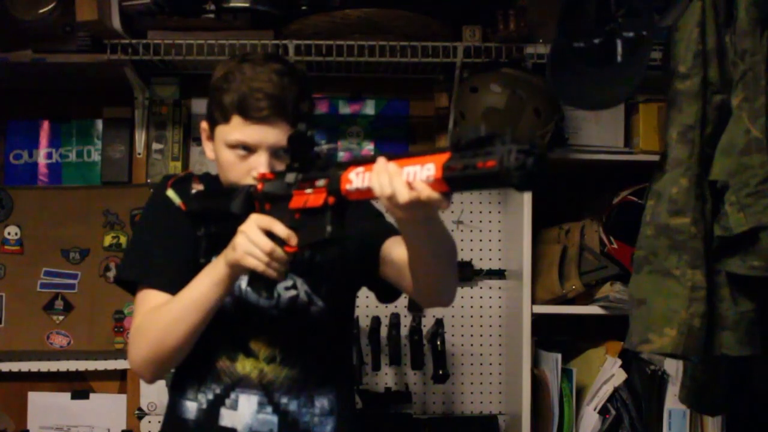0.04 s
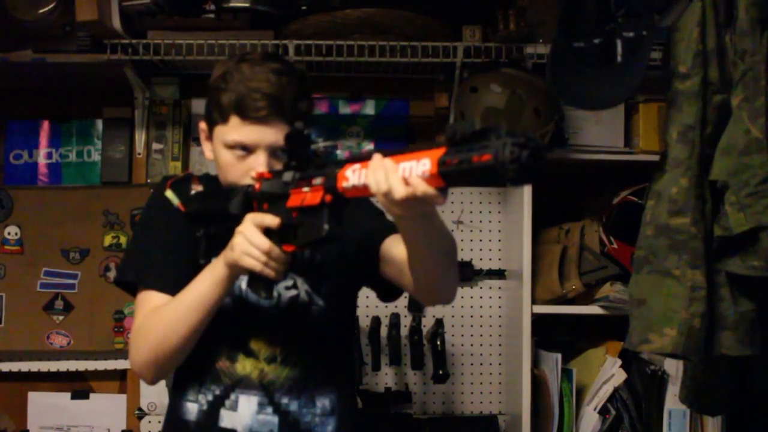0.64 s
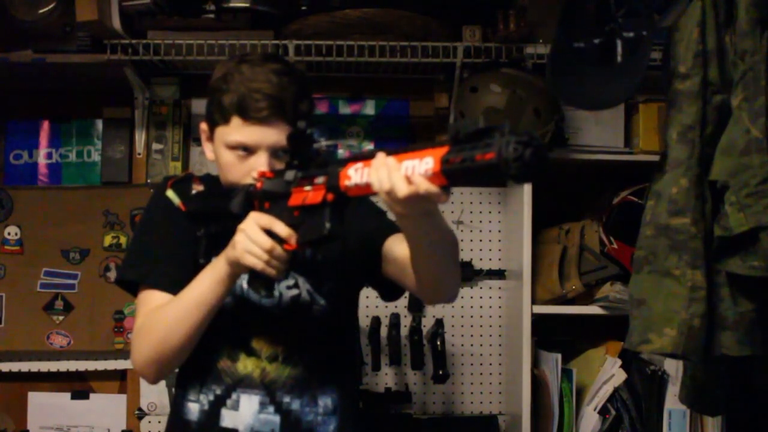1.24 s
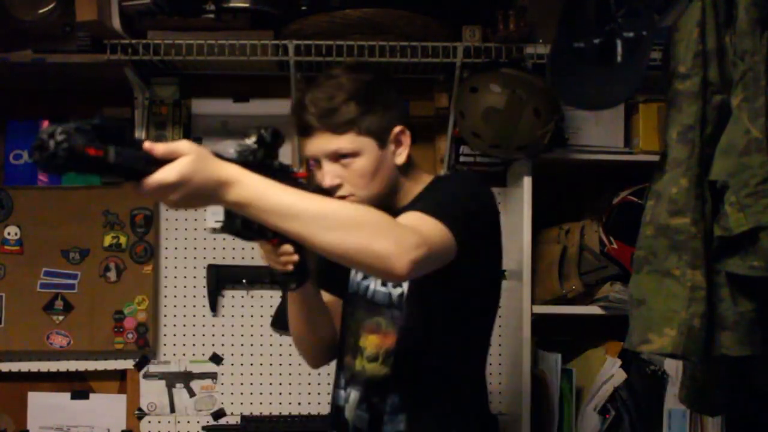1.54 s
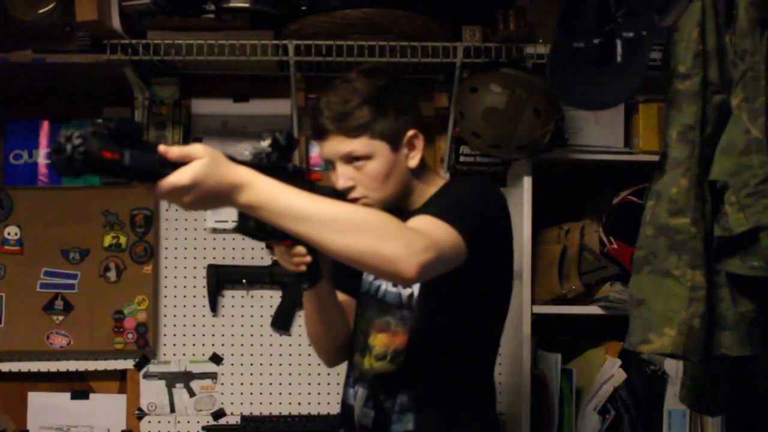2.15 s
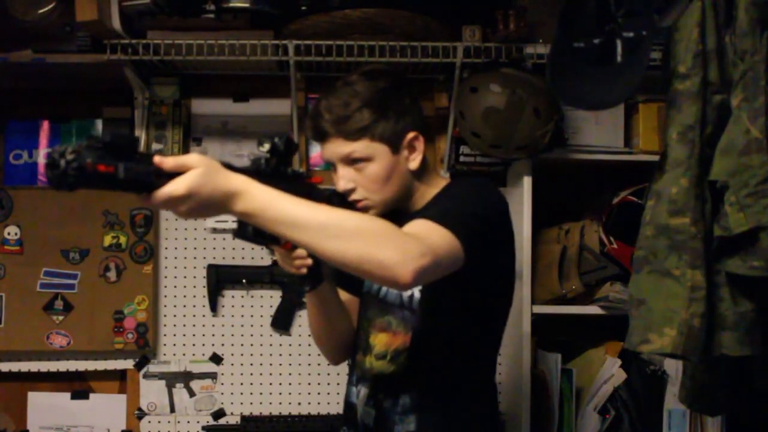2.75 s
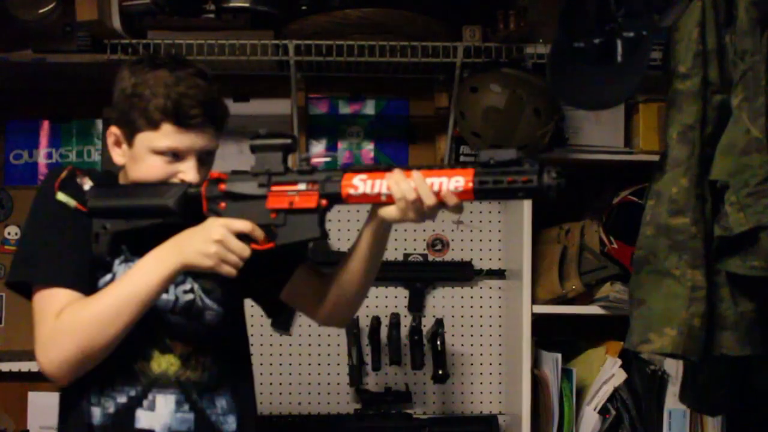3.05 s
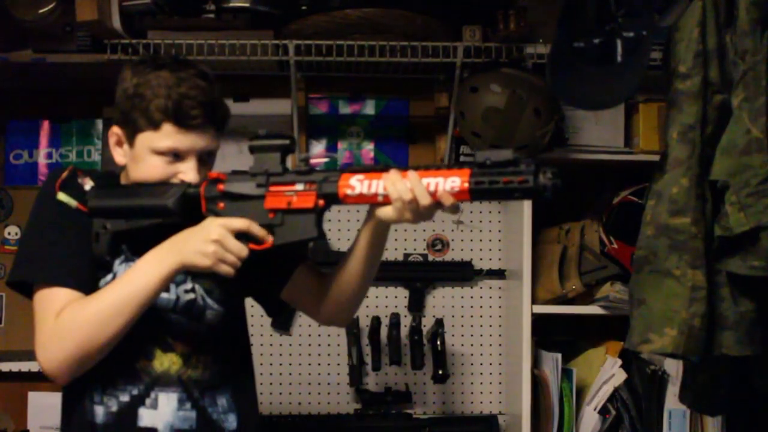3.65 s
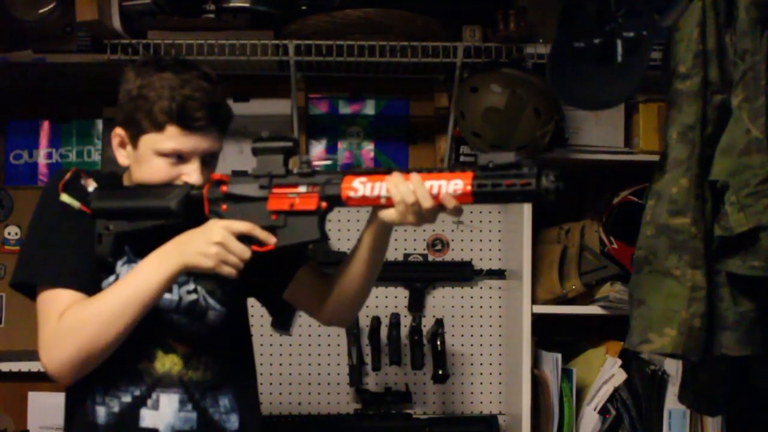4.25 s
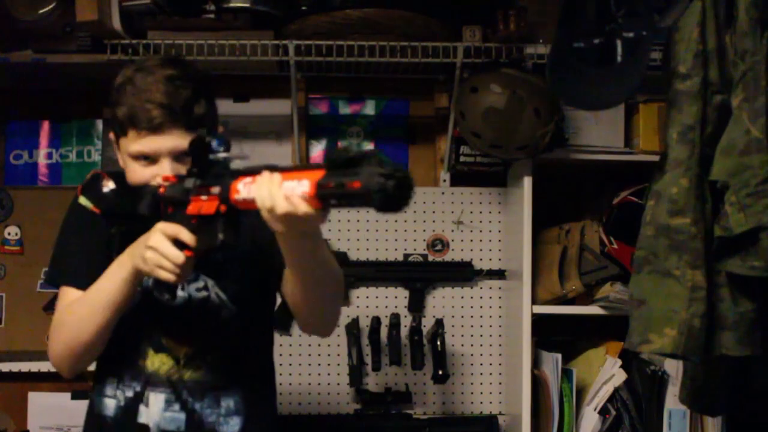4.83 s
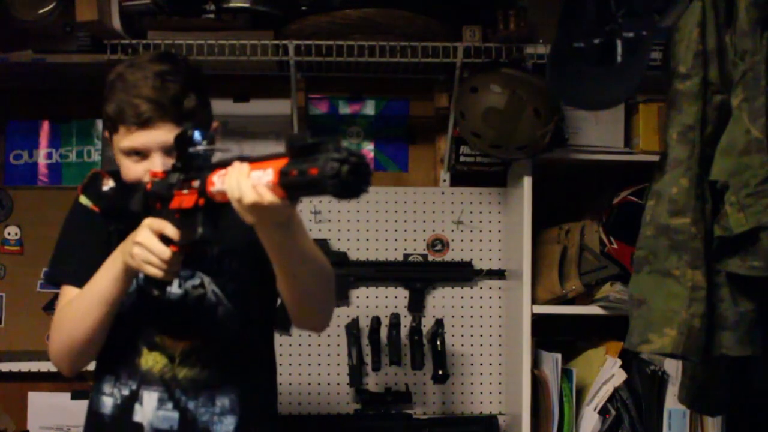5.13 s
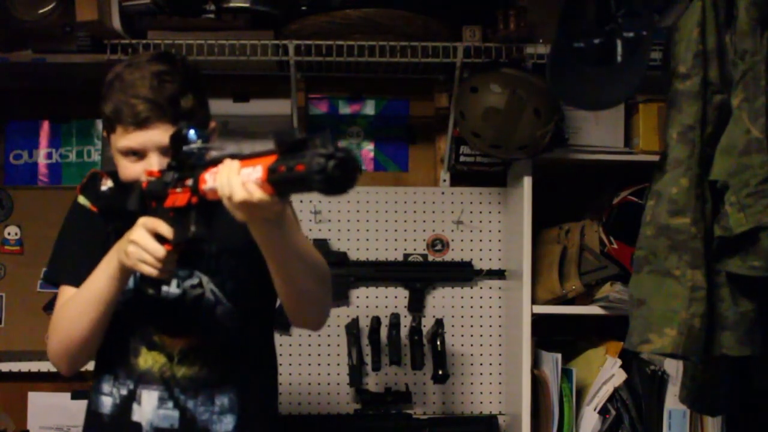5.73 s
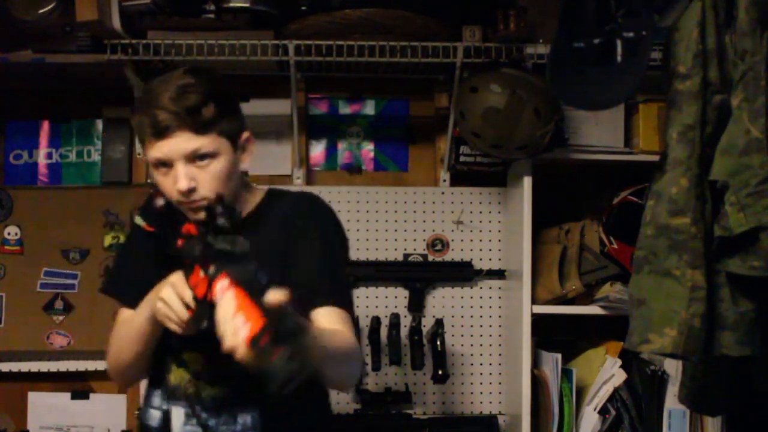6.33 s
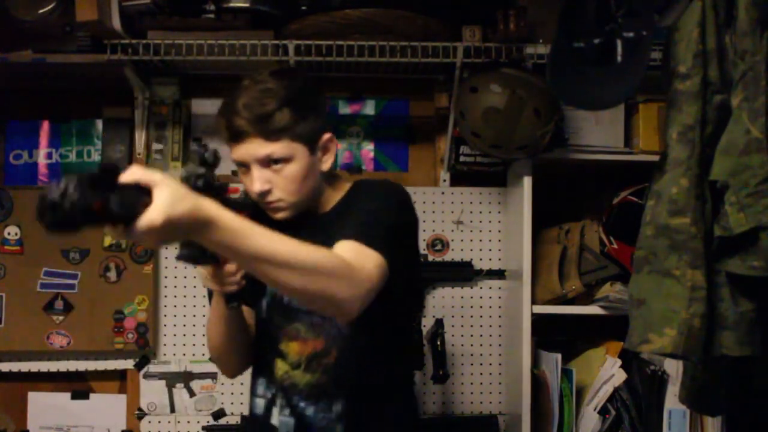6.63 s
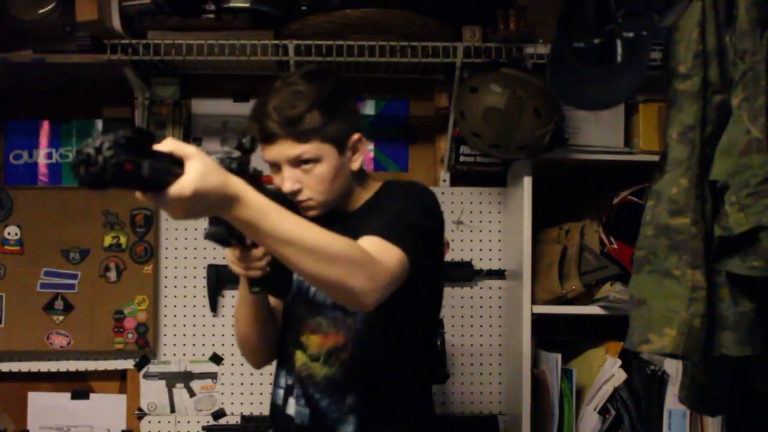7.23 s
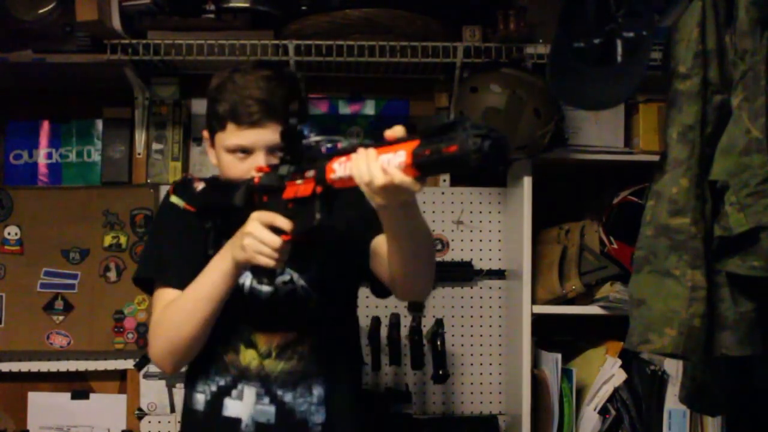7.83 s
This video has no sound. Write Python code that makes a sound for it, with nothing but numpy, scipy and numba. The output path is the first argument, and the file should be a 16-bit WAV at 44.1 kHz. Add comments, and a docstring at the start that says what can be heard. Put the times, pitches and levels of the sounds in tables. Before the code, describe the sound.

An electric airsoft rifle fires eleven three-shot bursts close to the microphone in a small room. Each starts with a trigger snap and a brief whine of motor and gears, then three hard, rattling piston clacks. The bursts come about once a second, pause a little past halfway, then come faster. Faint handling clicks and a sleeve rustle fall in the gaps, over a low room rumble.

```python
"""Over the low rumble of a small, cluttered room, an electric airsoft rifle fires eleven three-round bursts.
Each time the trigger snaps, the motor spins up, the gears whine against the spring, and the piston slams home
three times, ringing the shell. An automatic gain control ducks under the burst and lets the rumble swell back.
Loose parts click in some of the pauses; a thin steel ring lingers after the fifth and seventh bursts, and
before the ninth, sleeves rustle as the gun swings round."""
import sys
import numpy as np
from scipy import signal
from scipy.fft import rfft, irfft, next_fast_len
from scipy.io import wavfile
from numba import njit

SR = 44100
rng = np.random.default_rng(int(sys.argv[2]) if len(sys.argv) > 2 else 0)


def wav_record(signal):
    """Record a signal, one row per channel, as 16-bit PCM in the file named by sys.argv[1]."""
    frames = np.transpose(np.atleast_2d(signal))
    bounded = np.clip(frames, -1, 1)
    # unit amplitude maps onto the largest positive 16-bit level
    quanta = np.round(bounded * 32767).astype(np.int16)
    wavfile.write(sys.argv[1], SR, quanta)


N = 351918
TIME = np.arange(N) / SR
AGE = TIME[:int(.75 * SR)]   # seconds since the onset of one sound

# spectrum of the room's rumble and hiss: f/Hz, relative level/dB
ROOM_TONE_COLOUR = [(15, -49.5), (25, -17.5), (52, -21), (80, -2), (126, -1), (267, -12), (340, -3),
                    (399, -14), (598, -14), (666, -19), (804, -16.5), (1750, -25.5), (1950, -22),
                    (2560, -31.5), (8810, -44.5), (15500, -43)]
# narrow bands in the background noise, a low hum and a faint, steady ring near 2 kHz:
# f/Hz, width/Hz, level/dB
BACKGROUND_BANDS = [(90, 26, -46.5), (113, 15, -44), (212, 25, -48), (318, 3.1, -52.5), (2070, 130, -61.5)]
# cue list of the bursts: first slam t/s, gap to second slam/s, free-running tooth rate/Hz,
# trigger level/dB, motor level/dB, slam level/dB, crack and puff against slam/dB
BURSTS = [(0.1855, .0556, 1152, -25, -7.5, 21.5, 2.5), (1.176, 0.062, 1379, -19, -10.5, 19, 4.5),
          (1.7148, 0.064, 1354, -26, -10, 22.5, 5.5), (2.6440, 0.064, 1350, -22, -10.5, 21.5, 4),
          (3.2400, 0.065, 1350, -23.5, -10, 19.5, -15.5), (4.0310, 0.064, 1371, -21, -10.5, 20.5, -14),
          (5.4860, 0.062, 1375, -19.5, -9.5, 21, 4.5), (6.0753, .0648, 1362, -24, -12, 21, 3.5),
          (6.9070, .0634, 1364, -28.5, -12.5, 21, 4.5), (7.3385, .0640, 1362, -32.5, -13, 24, 4),
          (7.8713, 0.064, 1367, -25, -8, 29, 2)]
# spectrum of scraping gears: f/Hz, relative level/dB
GEAR_COLOUR = [(240, -56.5), (400, -24.5), (527, -11), (860, -13.5), (1240, -4), (1560, -11), (3680, -2.5),
               (15500, -29)]
# partials of the gear whine: multiple of the tooth rate, relative level/dB
WHINE_PARTIALS = [(1, -6.5), (2, -6.5), (3, -9), (4, -19)]
# the gears catch hard on the spring in the first burst: t/s, level/dB
GEAR_CATCHES = [(0.113, -12.5), (0.129, -3)]
# spectrum of the piston's slide and the gun's rattle: f/Hz, relative level/dB
SLAM_COLOUR = [(41, -56), (70, -25.5), (250, -14.5), (400, -14.5), (572, -3), (751, -10), (920, -4.5),
               (1100, -0.5), (1230, -8.5), (1410, -1.5), (1580, -13), (1940, 3), (2540, -6), (3190, -3.5),
               (5740, -8.5), (9220, -18.5), (15500, -19)]
# ringing modes of gearbox and shell: f/Hz, level against slam/dB, t60/s
GUN_MODES = [(175, -39, 0.049), (254, -26, 0.071), (532.3, -27.5, 0.15), (656, -25.5, 0.12),
             (886, -19.5, 0.068), (1106, -29.5, 0.19), (1456, -24.5, 0.13), (2000, -22.5, 0.051),
             (2120, -30.5, 0.071), (3224, -23.5, 0.13), (3515, -24, 0.06), (4290, -26.5, 0.048),
             (5200, -33, 0.034)]
# the gun clicks in the hands: t/s, level/dB, centre f/Hz, t60/s
HANDLING_CLICKS = [(0.516, -34.5, 2090, .08), (1.972, -29, 2000, .1), (4.732, -43.5, 2780, 0.11),
                   (6.435, -29, 3200, 0.077), (6.529, -40.5, 1780, 0.11), (6.620, -29, 3500, 0.1)]
# a faint, thin ring lingers after a burst: t/s, level/dB
LINGERING_RINGS = [(3.24, -36.5), (5.486, -39.5)]
# sleeve swishes: t/s, length/s, level/dB
SLEEVE_SWISHES = [(6.344, 0.22, -39.5), (6.582, 0.26, -39.5)]
# spectrum of rustling cloth: f/Hz, relative level/dB
CLOTH_COLOUR = [(180, -34.5), (300, 3), (597, -10), (647, -28), (738, -7), (1790, -3), (15000, -31)]
# decay of the room's reverb: f/Hz, t60/s
ROOM_T60 = [(150, 0.38), (600, 0.33), (1300, 0.21), (2100, 0.26), (3500, 0.22), (6000, 0.22), (14000, 0.13)]
# the gain control jumps back to full gain: t/s
GAIN_RESETS = [1.478, 3.013]

WINDUP_GAPS = 1.43   # from rest, the first draw of the spring takes this many gaps
LAST_GAP_S = .0518   # second slam to third, at full speed


def from_db(db):
    """Decibels to gain."""
    return 10 ** (np.asarray(db) / 20)


def rms_one(x):
    """Scale to unit power."""
    return x / np.sqrt(np.mean(x ** 2) + 1e-20)


def at_hz(points, hz):
    """Read a table on a log-frequency axis."""
    known_hz, values = np.transpose(points)
    return np.interp(np.log(np.maximum(hz, 1)), np.log(known_hz), values)


def dying(t60):
    """Exponential decay from height 1."""
    return np.exp(-np.log(1000) * AGE / t60)


def add(track, s, sound):
    """Mix a sound into the track at s seconds."""
    start = min(round(s * SR), N)
    track[start:start + len(sound)] += sound[:N - start]


def noise(colour, size=len(AGE)):
    """Noise of a given spectrum, rms 1."""
    padded = next_fast_len(size)
    gain = from_db(at_hz(colour, np.fft.rfftfreq(padded, 1 / SR)))
    return rms_one(irfft(rfft(rng.standard_normal(padded)) * gain, padded)[:size])


def resonance(x, hz, width_hz):
    """Two-pole resonance, gain 1 at its peak."""
    r = np.exp(-np.pi * width_hz / SR)
    feedback = [1, -2 * r * np.cos(2 * np.pi * hz / SR), r * r]
    return signal.lfilter(np.array([1, 0, -1]) * (1 - r * r) / 2, feedback, x + 1e-18)


def noise_band(hz, width_hz, size=len(AGE)):
    """One band of noise, rms 1."""
    return rms_one(resonance(rng.standard_normal(size), hz, width_hz))


def low_cut(x, hz, order=2):
    """Roll off the bass."""
    return signal.sosfilt(signal.butter(order, hz, "high", fs=SR, output="sos"), x + 1e-18)


def slam_times(first, gap):
    """The three slams of a burst close up as the motor gains speed."""
    return first + np.array([0, gap, gap + LAST_GAP_S])


def room_tone(bed_db):
    """A steady bed of rumble and hiss, with a low hum and a faint ring near 2 kHz."""
    bands = sum(from_db(db) * noise_band(hz, width_hz, N) for hz, width_hz, db in BACKGROUND_BANDS)
    return from_db(bed_db) * noise(ROOM_TONE_COLOUR, N) + bands


def triggers(t60, rise_s, clack_hz, clack_db, tick_hz, tick_db, catch_t60):
    """The trigger snaps and the gears take up their slack; a hard catch adds a rasp."""
    out = np.zeros(N)
    attack = 1 - np.exp(-AGE / rise_s)
    for first, gap, _, trigger_db, *_ in BURSTS:
        scrape = noise(GEAR_COLOUR)
        clack = from_db(clack_db) * rms_one(resonance(scrape, clack_hz, width_hz=250))
        tick = from_db(tick_db) * rms_one(resonance(scrape, tick_hz, width_hz=800))
        snap = rms_one(scrape + clack + tick) * attack * dying(t60)
        add(out, first - WINDUP_GAPS * gap, from_db(trigger_db) * snap)
    for s, db in GEAR_CATCHES:
        add(out, s, from_db(db) * noise(GEAR_COLOUR) * attack * dying(catch_t60))
    return out


def motor(spin_up_s, coast_s, spring_sag, wobble, flutter, grind_db, tooth_depth):
    """Meshing teeth whine and grind, rising as the motor spins up, sagging near the spring's full draw."""
    out = np.zeros(N)
    for first, gap, tooth_hz, _, motor_db, *_ in BURSTS:
        windup = WINDUP_GAPS * gap
        releases = slam_times(windup, gap)
        shots_drawn = np.interp(AGE, [0, *releases], np.arange(len(releases) + 1))
        draw = shots_drawn % 1
        run_down = np.exp(-np.maximum(AGE - releases[-1], 0) / coast_s)
        spin = (1 - np.exp(-AGE / spin_up_s)) * run_down
        shake = 1 + wobble * noise_band(hz=90, width_hz=160)
        speed = spin * (1 - spring_sag * draw ** 8) * shake
        phase = 2 * np.pi * np.cumsum(tooth_hz * speed) / SR
        whine = sum(np.sqrt(2) * from_db(db) * np.sin(k * phase + rng.uniform(0, 2 * np.pi))
                    for k, db in WHINE_PARTIALS)
        whine *= 1 + flutter * noise_band(hz=110, width_hz=120)
        whine *= spin   # it cuts through the grind only at speed
        throb = 1 + tooth_depth * np.cos(phase)   # every tooth scrapes
        grind = from_db(grind_db) * noise(GEAR_COLOUR) * throb
        eased = shots_drawn >= 1   # the gears labour less once the first shot is away
        gears = whine * from_db(-12.5 * eased) + grind * from_db(-1.5 * eased)
        add(out, first - windup, from_db(motor_db) * spin ** 1.9 * gears)
    return out


def muzzle_puff(db, width_s):
    """Air pops from the muzzle in one tiny bell-shaped pulse."""
    pulse = np.exp(-((AGE - 2 * width_s) / width_s) ** 2)
    return low_cut(-from_db(db) * pulse, hz=160)


def piston_crack(hz, width_hz, bounce_s, bounce_db, tick_hz, tick_db):
    """The piston head strikes the cylinder end with a bright metal tick and bounces once."""
    blows = np.zeros(len(AGE))
    blows[0], blows[round(bounce_s * SR)] = 1, from_db(bounce_db)
    snap = resonance(resonance(blows, hz, width_hz), hz, 2 * width_hz)
    tick = from_db(tick_db) * resonance(blows, tick_hz, width_hz=4400)
    return snap / np.abs(snap).max() + tick


def shell_ring(scatter_db):
    """Gearbox and shell ring, their modes struck a little differently in each burst."""
    ring = 0
    for hz, db, t60 in GUN_MODES:
        strength = from_db(db + rng.normal(0, scatter_db)) * rng.choice([-1, 1])
        ring += strength * np.sin(2 * np.pi * hz * AGE) * dying(t60)
    return ring


def slams(slide_db, slide_s, puff_s, puff_lead_s, rattle_db, rattle_t60, loose_share, accents_db):
    """The piston slides, air pops, the head cracks, the gun rattles; returns hits and rings apart."""
    hits, rings = np.zeros((2, N))
    rush = np.exp(-AGE[:SR // 50] / slide_s)[::-1]   # swells into the hit
    puff = muzzle_puff(db=-12.5, width_s=puff_s)
    crack = piston_crack(hz=3800, width_hz=3100, bounce_s=.0052, bounce_db=-8.5,
                         tick_hz=13100, tick_db=1.5)
    for first, gap, *_, slam_db, crack_db in BURSTS:
        # the aim holds still within a burst, so its slams sound alike, apart from the loose parts
        shell = np.sqrt(1 - loose_share) * noise(SLAM_COLOUR)
        ring = shell_ring(scatter_db=2.2)
        for s, db in zip(slam_times(first, gap), slam_db + np.array(accents_db)):
            loose_parts = np.sqrt(loose_share) * noise(SLAM_COLOUR)
            rattle = from_db(rattle_db) * (shell + loose_parts) * dying(rattle_t60)
            slide = rush * noise(SLAM_COLOUR, len(rush))
            add(hits, s - len(rush) / SR, from_db(db + slide_db) * slide)
            add(hits, s - puff_lead_s - 2 * puff_s, from_db(db + crack_db) * puff)
            add(hits, s, from_db(db) * (from_db(crack_db) * crack + rattle))
            add(rings, s, from_db(db) * ring)
    return low_cut(hits, hz=165), rings   # so small a body radiates no deep bass


def handling_clicks():
    """Loose parts click as the gun shifts in the hands."""
    out = np.zeros(N)
    for s, db, hz, t60 in HANDLING_CLICKS:
        click = resonance(noise_band(hz, width_hz=1700), hz, width_hz=3500)
        add(out, s, from_db(db) * rms_one(click) * dying(t60))
    return out


def lingering_ring(hz, t60):
    """A thin steel ring outlasts the burst."""
    out = np.zeros(N)
    for s, db in LINGERING_RINGS:
        add(out, s, from_db(db) * np.sin(2 * np.pi * hz * AGE) * dying(t60))
    return out


def sleeves():
    """Cloth brushes the stock in soft swells."""
    out = np.zeros(N)
    for s, length_s, db in SLEEVE_SWISHES:
        swell = np.sin(np.pi * np.minimum(AGE / length_s, 1))
        add(out, s, from_db(db) * swell * noise(CLOTH_COLOUR))
    return out


def room_reverb(x, wet_db, build_s):
    """Dense reflections off shelves and walls build up, then die band by band."""
    edges_hz = np.geomspace(60, 17000, 17)
    white, tail = rng.standard_normal((2, len(AGE))), 0
    for k, band in enumerate(zip(edges_hz, edges_hz[1:])):
        wash = signal.sosfilt(signal.butter(2, band, "band", fs=SR, output="sos"), white[k % 2])
        centre_hz = np.sqrt(np.prod(band))
        tail += wash * dying(at_hz(ROOM_T60, centre_hz))
    tail *= 1 - np.exp(-AGE / build_s)
    return x + from_db(wet_db) * signal.fftconvolve(x, tail / np.linalg.norm(tail))[:N]


@njit
def ducking(over_db, reset, attack_s, hold_s, release_db_per_s):
    """Gain reduction in dB: bites quickly on overload, holds, then ebbs at a steady rate."""
    cut_db, cut, wait = np.zeros(len(over_db)), 0., 0.
    for i in range(len(over_db)):
        wait -= 1
        if reset[i]:
            cut = 0.
        if over_db[i] > cut:
            cut += (over_db[i] - cut) / (attack_s * SR)
            wait = hold_s * SR
        elif wait < 0:
            cut = max(0., cut - release_db_per_s / SR)
        cut_db[i] = cut
    return cut_db


def gain_control(x, threshold_db, peak_fall_db_per_s, attack_s, hold_s, release_db_per_s):
    """The gain rides the peak level, so the room pumps; at each reset it is full again."""
    fall = peak_fall_db_per_s * TIME
    level_db = 20 * np.log10(np.abs(x) + 1e-9)
    peak_db = np.maximum.accumulate(level_db + fall) - fall
    reset = np.isin(np.arange(N), np.round(np.array(GAIN_RESETS) * SR))
    return x * from_db(-ducking(peak_db - threshold_db, reset, attack_s, hold_s, release_db_per_s))


def scene():
    """Rifle and handling feed the reverb; the shell rings and the thin lingering ring sit dry over the room
    tone."""
    gears = motor(spin_up_s=.023, coast_s=.004, spring_sag=.27, wobble=.011, flutter=.28,
                  grind_db=-1.5, tooth_depth=.52)
    snaps = triggers(t60=.24, rise_s=.00036, clack_hz=1070, clack_db=-2.5, tick_hz=3950, tick_db=-7,
                     catch_t60=.083)
    hits, rings = slams(slide_db=-12, slide_s=.0024, puff_s=.000072, puff_lead_s=.0008, rattle_db=-11,
                        rattle_t60=.084, loose_share=.74, accents_db=(1.2, 0, -1.5))
    rifle = snaps + gears + hits + sleeves() + handling_clicks()
    in_room = room_reverb(rifle, wet_db=-11, build_s=.0079)
    return (in_room + rings + lingering_ring(hz=3905, t60=1) + room_tone(bed_db=-39.5))[None]


def record(dry):
    """Gain control, clipping on the slams that outrun it, a low cut and a steep cut at the top."""
    ridden = gain_control(dry[0], threshold_db=-7.5, peak_fall_db_per_s=1499, attack_s=.012,
                          hold_s=.25, release_db_per_s=36.5)
    clipped = np.clip(ridden, -1, 1)
    high_cut = signal.ellip(10, .2, 70, 15750, fs=SR, output="sos")
    return signal.sosfilt(high_cut, low_cut(clipped, hz=40, order=1))[None]


dry = scene()
out = record(dry)
wav_record(out)
```